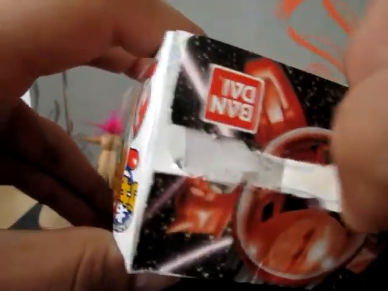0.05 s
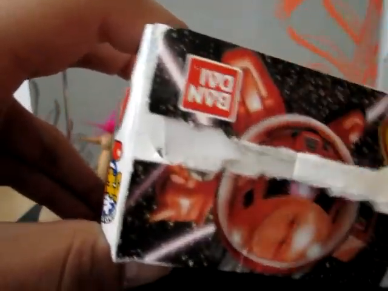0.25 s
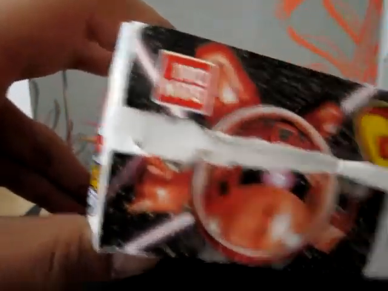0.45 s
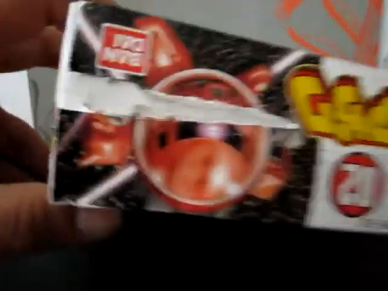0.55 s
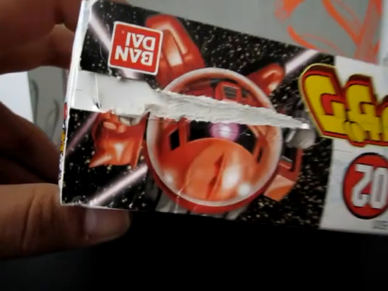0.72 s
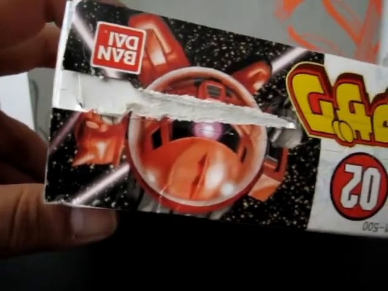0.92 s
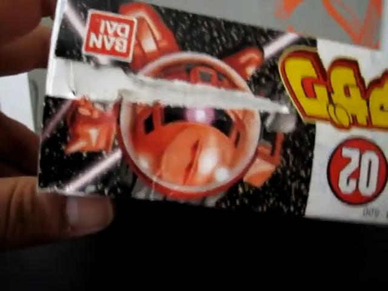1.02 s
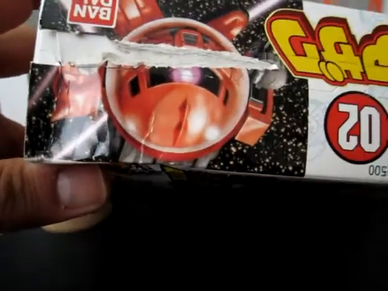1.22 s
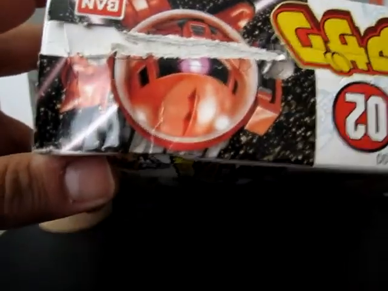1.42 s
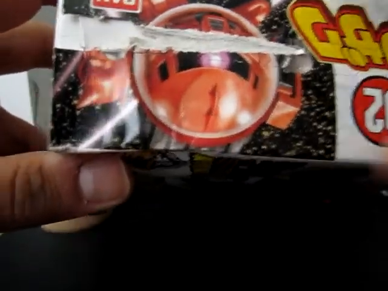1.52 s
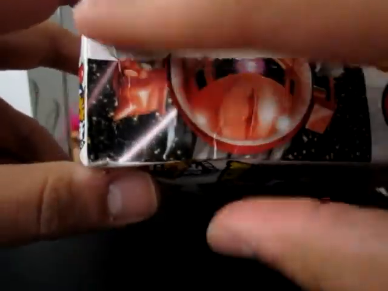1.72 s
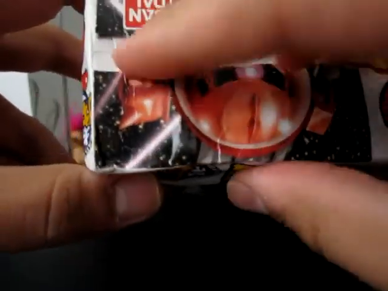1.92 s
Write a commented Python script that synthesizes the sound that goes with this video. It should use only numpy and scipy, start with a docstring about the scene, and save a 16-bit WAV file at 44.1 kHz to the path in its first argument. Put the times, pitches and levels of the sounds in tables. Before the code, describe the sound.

Cardboard tearing loudly and close, with crisp snaps and hollow knocks, then near quiet and soft fumbling

```python
"""A strip is torn off a small cardboard box near the listener, then fingers shift and grip the box again.
Fibres rip in dense crackle, as filtered random clicks; card snaps, as short noise bursts; the hollow box
knocks, as decaying modes driven by brief pushes. During the tear a faint even tick begins, then a thin high
tone and later a low hum waver, as narrow-band noise. Skin rubs and the card snaps and knocks again, softer.
Room hush and a low rumble lie beneath, as filtered noise."""
import sys
import numpy as np
from scipy import signal
from scipy.fft import rfft, irfft, next_fast_len
from scipy.io import wavfile
from scipy.ndimage import uniform_filter1d

SR = 44100
rng = np.random.default_rng(int(sys.argv[2]) if len(sys.argv) > 2 else 0)


def unload_wav(signal):
    """Save mono or channel-first audio to the path in sys.argv[1] as 16-bit WAV at rate SR, clipped to [-1, 1]."""
    wavfile.write(
        sys.argv[1],
        SR,
        np.round(np.clip(np.atleast_2d(signal).T, -1, 1) * 32767).astype(np.int16),
    )


N = 85995

# Modes of the hollow box. Each row: frequency in Hz, relative level in dB, 60 dB decay time in seconds
# (the knocks lengthen any decay below 10 ms to 10 ms).
BOX_MODES = [(257, -3.5, 0.027), (303, -3, 0.024), (340, -8.5, 0.055), (445, -2, 0.021), (495, -5, 0.058),
             (546.5, -3, 0.048), (567.8, 2.5, 0.061), (618, 4, 0.036), (666, 2.5, 0.044), (720, -6, 0.031),
             (770, -10, 0.022), (1320, 12.5, 0.0063)]


def undb(db):
    """Level and amplitude: 20 dB is a factor of ten in gain."""
    return 10 ** (np.asarray(db) / 20)


def unit(x):
    """Normalisation: scale to an rms of 1."""
    return x / np.sqrt(np.mean(x ** 2))


def decay(t, t60_s):
    """Exponential damping: the amplitude falls by 60 dB in t60_s."""
    return np.exp(-np.log(1000) * t / t60_s)


def bandpass(x, order, low_hz, high_hz):
    """Band limiting: a Butterworth filter passes low_hz to high_hz."""
    return signal.sosfilt(signal.butter(order, [low_hz, high_hz], "band", fs=SR, output="sos"), x)


def colour(x, points):
    """Spectral shaping: levels follow the points on a log frequency axis and drop sharply outside them."""
    point_hz, point_db = np.array(points, float).T
    size = next_fast_len(N)
    f = np.arange(size // 2 + 1) * SR / size + 1  # 1 Hz offset avoids log(0)
    gain_db = np.interp(np.log(f), np.log(point_hz), point_db, point_db[0] - 46.0, point_db[-1] - 31)
    return irfft(rfft(x, size) * undb(gain_db), size)[:N]


def ring(x, hz, t60_s):
    """Damped resonance: a two-pole filter answers a unit click with a decaying sine of height near 1."""
    radius = np.exp(-np.log(1000) / (max(t60_s, .002) * SR))
    angle = 2 * np.pi * hz / SR
    return signal.lfilter([0, np.sin(angle)], [1, -2 * radius * np.cos(angle), radius * radius], x)


def clicks(times_s, gains):
    """Impulse excitation: single-sample clicks, which add where they coincide."""
    x = np.zeros(N)
    np.add.at(x, np.clip((np.asarray(times_s) * SR).astype(int), 0, N - 1), gains)
    return x


def walk(hz):
    """Random modulation: levels held for 1 / hz seconds, then slewed by a moving average as long."""
    hold = int(SR / hz)
    levels = rng.standard_normal(N // 50)[:N // hold + 1]
    return 1.2 * uniform_filter1d(np.repeat(levels, hold)[:N], hold)  # spread near 1


def favour(hz, focus_hz):
    """Modal coupling: contact favours modes near one pitch; loss grows with octave distance squared."""
    octave_loss_db, floor_db = -40, -9.5  # at one octave away; the loss stops at the floor
    return undb(np.maximum(octave_loss_db * np.log2(hz / focus_hz) ** 2, floor_db))


def fibres():
    """Random impulsive fracture: fibres break as dense clicks of uneven size and either sign."""
    rate_per_s, spread_db = 7000, 2  # the spread is the mean of an exponential law
    when, size, sign = rng.random((40000, 3)).T
    used = np.arange(len(when)) < rate_per_s * N / SR
    return clicks(when * N / SR, used * np.sign(sign - .5) * undb(-spread_db * np.log(size)))


def box_body(shake, focus_hz):
    """Modal superposition: one shaking force drives every box mode, weighted by the contact place."""
    return sum(ring(shake * undb(db) * favour(hz, focus_hz), hz, t60_s) for hz, db, t60_s in BOX_MODES)


def rip():
    """Fracture and friction noise: clicks excite the box modes and hiss directly, under one shared flutter."""
    # Each row: time in seconds, level in the box in dB, level of the middle in dB, level of the treble in dB.
    rip_levels = [(0, -27, -34.5, -27.5), (0.016, -60, -43.5, -40.5), (0.091, -63, -44.5, -36),
                  (0.107, -16, -32, -23.5), (.122, -32.5, -29, -34.5), (0.171, -27, -33.5, -30),
                  (.183, -48, -37, -31.5), (.205, -44, -39, -39), (0.224, -37.5, -44, -51),
                  (0.245, -71, -48.5, -38), (0.251, -47, -36, -37), (0.286, -50, -33, -30.5),
                  (0.293, -25, -29, -22.5), (.36, -26, -35, -30), (.41, -31, -38.5, -28.5),
                  (0.449, -20, -44, -29), (0.485, -20, -35.5, -22.5), (0.514, -31.5, -29, -29.5),
                  (0.538, -26.5, -29.5, -27), (0.545, -33, -55, -47.5), (0.584, -46, -45.5, -46),
                  (.6, -47, -60, -61), (0.627, -45.5, -61, -56), (0.636, -39.5, -43.5, -52),
                  (0.666, -46, -73, -73.5), (.7, -65, -78, -75), (.725, -69, -65, -60.5),
                  (.78, -65, -55.5, -62.5), (0.801, -94, -79, -95), (1.06, -52.5, -58.5, -65),
                  (1.2, -51.5, -58.5, -63.5), (1.4, -63, -61, -70), (1.56, -53, -62, -66.5),
                  (1.635, -51, -56, -57.5), (1.67, -37, -45.5, -43.5), (1.721, -46, -57, -52.5),
                  (1.81, -38.5, -48.5, -51.5), (1.86, -41, -41.5, -46.5), (1.885, -41, -49, -58),
                  (1.902, -41, -42, -57.5), (1.935, -36.5, -40.5, -52), (1.95, -26, -53, -75)]
    # Spectrum of the middle hiss. Each row: frequency in Hz, density in dB per Hz.
    middle_spectrum = [(530, 4.5), (900, -2), (1250, 1), (1480, -8.5), (2000, -1.5), (2520, -8), (3020, -7),
                       (3800, -15.5), (5200, -9.5), (8360, -48)]
    # Spectrum of the treble hiss. Each row: frequency in Hz, density in dB per Hz.
    treble_spectrum = [(2180, -7), (2950, -3.5), (4200, -6.5), (5100, -3.5), (7530, -0.5), (10800, -9),
                       (13100, -13), (14100, -12.5), (15800, -16.5)]
    # Pitch that the contact favours. Each row: time in seconds, frequency in Hz.
    contact_focus = [(0, 488), (.2, 443), (.3, 602), (.4, 450), (.47, 474), (.53, 676), (.6, 335),
                     (1.2, 344), (1.65, 410), (1.78, 346), (1.86, 494), (1.95, 685)]
    flutter_db, flutter_hz = 2, 245
    t = np.arange(N) / SR
    times, *levels_db = np.array(rip_levels).T
    flutter = flutter_db * walk(flutter_hz)
    box, middle, treble = (undb(np.interp(t, times, db) + flutter) for db in levels_db)
    shake = fibres()
    focus_hz = np.interp(t, *np.array(contact_focus).T)
    # The box level is relative to a steady shake at the first focus.
    reference = np.std(box_body(shake, contact_focus[0][1]))
    body = box_body(shake * box, focus_hz) / reference
    middle_hiss = middle * unit(colour(fibres(), middle_spectrum))
    treble_hiss = treble * unit(colour(fibres(), treble_spectrum))
    return body + middle_hiss + treble_hiss


def hush():
    """Stationary background noise: a shaped spectrum whose level wanders slowly."""
    # Each row: frequency in Hz, density in dB per Hz, before normalisation.
    room_spectrum = [(15, -33.5), (25, -3), (248, -2.5), (500, -11), (654, -10), (834, -15.5),
                     (1510, -18.5), (3580, -24), (8970, -31), (13100, -39.5), (15800, -40)]
    room_db, wander_hz = -55.5, 8
    level = undb(room_db + walk(wander_hz))  # wanders by about 1 dB
    return level * unit(colour(rng.standard_normal(N), room_spectrum))


def rumble():
    """Low band noise: amplitude modulation makes a faint rumble swell early and again near the end."""
    # Each row: time in seconds, level in dB.
    rumble_levels = [(0, -57.5), (.2, -46), (.36, -47.5), (.44, -73), (1.6, -73.5), (1.85, -56),
                     (1.95, -61)]
    level = undb(np.interp(np.arange(N) / SR, *np.array(rumble_levels).T))
    return level * unit(bandpass(rng.standard_normal(N), 2, 30, 115))


def snaps():
    """Sudden fracture: a click and decaying noise excite a narrow pitched band and a broad band."""
    # Each row: start in seconds, nominal peak in dB for a 15 ms decay, centre in Hz,
    # 60 dB decay time in seconds, broad band relative to the pitched band in dB.
    snap_events = [(0.041, -38, 6500, 0.013, -8), (0.0556, -15, 6600, 0.005, 4),
                   (.1, -8.5, 1700, 0.0085, 27), (0.1073, -9.5, 8400, 0.011, 5),
                   (0.1055, -10.5, 6300, 0.0052, 13), (0.112, -18, 7540, 0.041, 23),
                   (0.1328, -15, 7100, 0.018, 25), (0.1448, -5.5, 2600, 0.0059, 18),
                   (0.177, -16.5, 6900, 0.0089, 13), (0.191, -17.5, 8700, 0.017, 6),
                   (.207, -25, 8960, 0.013, 2), (.218, -26, 5000, .01, 12), (0.2512, -16, 3080, 0.029, 23),
                   (.267, -18.5, 9400, 0.019, -5), (0.277, -14.5, 7540, 0.02, 20),
                   (0.2903, -7.5, 7700, 0.019, 13), (0.293, -22, 2900, 0.09, -20),
                   (0.291, -20, 4900, 0.058, -19), (0.3027, -10, 995, 0.0086, -12),
                   (0.3097, -8.5, 7300, 0.013, 7), (.33, -14, 5600, 0.0095, 0),
                   (0.3408, -10.5, 7400, 0.0078, 4), (0.3533, -5.5, 7600, 0.0059, 7),
                   (0.353, -16, 3100, 0.015, -13), (0.387, -14, 6040, 0.01, -5), (0.4, -15, 6070, .015, -5),
                   (0.4788, -15, 5070, 0.018, -16), (0.4906, -8, 5400, 0.012, -26),
                   (0.5008, -12, 5240, 0.011, -8), (0.5361, -24.5, 1350, 0.034, -7),
                   (0.6317, -40, 2400, 0.018, 1), (1.2935, -34.5, 5430, 0.016, 6),
                   (1.3022, -23.5, 4880, 0.0093, 1), (1.309, -35, 5500, 0.025, -12),
                   (1.324, -44, 4700, 0.045, -4), (1.6443, -26, 1960, 0.028, -1),
                   (1.6583, -23.5, 2580, 0.0088, 18), (1.662, -19.5, 1250, 0.016, 4.5),
                   (1.6624, -29.5, 4530, 0.017, 11), (1.722, -34.5, 2030, 0.048, 0),
                   (1.769, -37, 1920, 0.019, -20), (1.7874, -44, 2010, 0.037, -16),
                   (1.816, -21.5, 2750, 0.009, -18), (1.8165, -24, 1620, 0.012, -2),
                   (1.829, -26, 1950, 0.016, -17), (1.8308, -29.5, 5000, 0.018, -32),
                   (1.892, -21, 1690, 0.0073, 1), (1.9091, -31, 2080, 0.014, -7)]
    reference_t60_s, rise_s = .015, .0004
    width = 0.26  # pitched band as a share of its centre
    broad_from, broad_to, broad_top_hz = .75, 4, 10800  # edges as shares of the centre; highest edge
    click_db, crest_db = 9, 22  # click over the noise; nominal peak over the rms
    out = np.zeros(N + 2000)
    t = np.arange(2000) / SR
    for start, db, hz, t60_s, broad_db in snap_events:
        burst = rng.standard_normal(len(t)) * decay(t, max(t60_s, .002)) * (1 - np.exp(-t / rise_s))
        burst[10] += undb(click_db)
        pitched = unit(bandpass(burst, 3, hz / (1 + width / 2), hz * (1 + width / 2)))
        broad = unit(bandpass(burst, 3, hz * broad_from, min(hz * broad_to, broad_top_hz)))
        snap = unit(pitched + undb(broad_db) * broad)
        # Equal rms over the window would make short snaps peak higher, so scale by root decay time.
        gain = undb(db - crest_db) * np.sqrt(t60_s / reference_t60_s)
        first = int(start * SR)
        out[first:first + len(t)] += gain * snap
    return out[:N]


def knocks():
    """Forced modal vibration: the wall flexes in and out once, and each push weights the modes anew."""
    # Each row: start in seconds, peak in dB before the box's low cut, favoured pitch in Hz.
    knock_events = [(0.107, -16.5, 560), (0.111, -17, 365), (0.143, -4.5, 595), (0.147, -12, 260),
                    (0.167, -15, 590), (0.175, -22.5, 650), (0.192, -21.5, 657), (0.219, -38, 500),
                    (0.256, -15, 290), (0.277, -9.5, 616), (0.289, -28, 700), (0.311, -13, 540),
                    (0.329, -8.5, 477), (0.351, -7, 447), (0.362, -9, 560), (0.377, -12.5, 354),
                    (0.436, -11.5, 524), (0.4516, -12, 490), (0.461, -10.5, 295), (0.4644, -7.5, 610),
                    (0.475, -9.5, 340), (0.485, -1.5, 467), (0.489, -2.5, 460), (0.497, -2.5, 620),
                    (0.504, -11.5, 690), (0.5105, -7, 566), (0.537, -19, 596), (0.584, -28.5, 244),
                    (0.635, -49, 300), (1.302, -40, 620), (1.604, -31, 410), (1.646, -31, 302),
                    (1.655, -22.5, 337), (1.66, -30, 622), (1.816, -23, 654), (1.83, -23.5, 487),
                    (1.892, -25, 496), (1.897, -26.5, 705), (1.907, -27, 390), (1.924, -26, 680),
                    (1.93, -22, 560), (1.934, -28, 760)]
    push_cycles, scatter_db = .5, 1.5  # standard deviation of the push, in cycles; of the mode levels
    out = np.zeros(N + 8000)
    t = np.arange(4000)[:, None] / SR
    hz, mode_db, t60_s = np.array(BOX_MODES).T
    modes = np.sin(2 * np.pi * hz * t) * decay(t, np.maximum(t60_s, .01))
    scatter = scatter_db * rng.standard_normal((len(knock_events), len(BOX_MODES)))
    u = np.arange(-400, 400) / SR
    for (start, db, focus_hz), own_db in zip(knock_events, scatter):
        envelope = np.exp(-.5 * (u * focus_hz / push_cycles) ** 2)
        push = -envelope * np.cos(2 * np.pi * focus_hz * u)
        response = modes @ (undb(mode_db + own_db) * favour(hz, focus_hz))
        knock = signal.fftconvolve(response, push)[310:]  # the push centres 2 ms after the start
        first = int(start * SR)
        out[first:first + len(knock)] += undb(db) * knock / abs(knock).max()
    return out[:N]


def ticks():
    """Periodic impulses: a small mechanism rings its modes, every second tick weaker and slightly early."""
    # Each row: frequency in Hz, relative level in dB, 60 dB decay time in seconds.
    tick_modes = [(1200, -3, 0.052), (1512, -1.5, 0.078), (1630, -5, 0.061), (2100, -6.5, 0.039)]
    start_s, period_s, early_s = .329, .1855, .002
    strong_db, weak_db = -48, -5  # weak ticks relative to strong ones
    k = np.arange(9)
    weak = k % 2
    impulses = clicks(start_s + k * period_s - early_s * weak, undb(strong_db + weak_db * weak))
    return sum(undb(db) * ring(impulses, hz, t60_s) for hz, db, t60_s in tick_modes)


def tones():
    """Narrow-band noise: a sharp resonance fed with noise wavers; a thin tone and a hum fade in and out."""
    # Each row: start in seconds, end in seconds, frequency in Hz, level in dB.
    tone_events = [(.92, 1.14, 2110, -71), (1.42, 1.62, 157, -59)]
    fade_s, width_hz = .04, 30
    t = np.arange(N) / SR
    out = np.zeros(N)
    for start, end, hz, db in tone_events:
        fade = np.clip(np.minimum(t - start, end - t) / fade_s, 0, 1)
        tone = unit(ring(rng.standard_normal(N), hz, 2.2 / width_hz))  # t60 = 2.2 / bandwidth
        out += undb(db) * fade * tone
    return out


def room_echo(x):
    """Diffuse reverberation: convolution with decaying noise of unit energy, after a 4 ms gap."""
    t60_s, echo_db = 0.16, -14
    t = np.arange(SR // 2) / SR
    tail = rng.standard_normal(len(t)) * decay(t, t60_s) * (t > .004)
    return undb(echo_db) * signal.fftconvolve(x, tail / np.sqrt(np.sum(tail ** 2)))[:N]


def scene():
    """Linear superposition: box sounds and their room tail add to the fainter sources."""
    low_hz = 198  # the small box radiates little below this
    high_pass = signal.butter(5, low_hz, "high", fs=SR, output="sos")
    box = signal.sosfilt(high_pass, rip() + snaps() + knocks())
    return (box + room_echo(box) + hush() + rumble() + ticks() + tones())[None]


def record(dry):
    """Saturation and band limiting: tanh rounds the highest peaks, then a steep low-pass cuts the top."""
    ceiling, top_hz = .95, 15900  # full scale is 1
    rounded = ceiling * np.tanh(dry / ceiling)
    return signal.sosfilt(signal.ellip(10, .2, 90, top_hz, fs=SR, output="sos"), rounded)


dry = scene()
out = record(dry)
unload_wav(out)
```